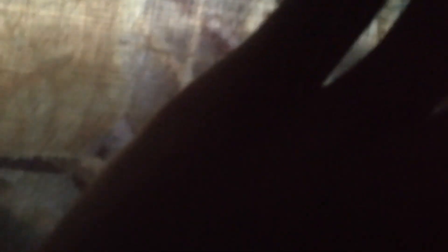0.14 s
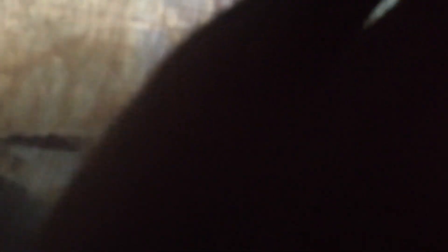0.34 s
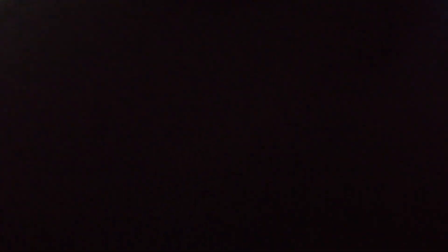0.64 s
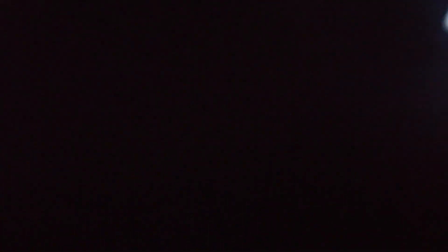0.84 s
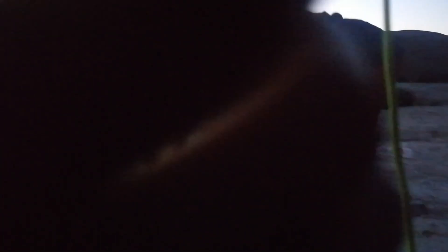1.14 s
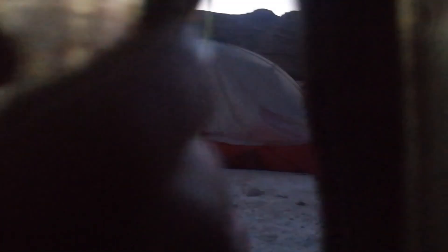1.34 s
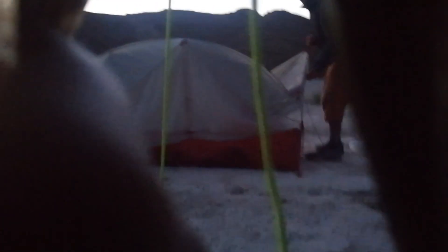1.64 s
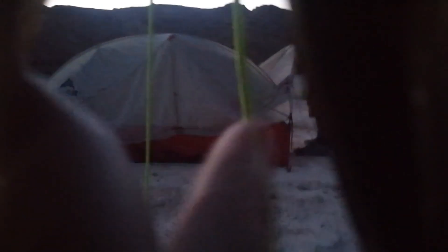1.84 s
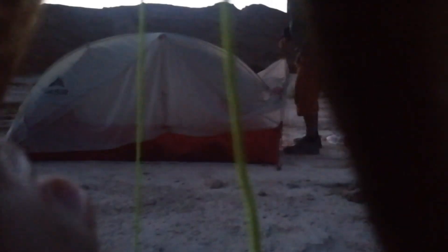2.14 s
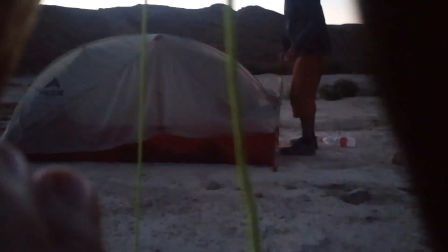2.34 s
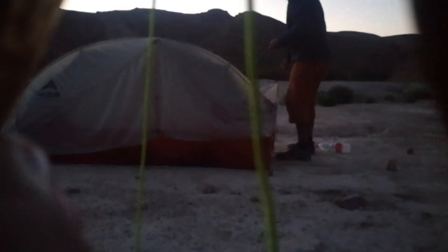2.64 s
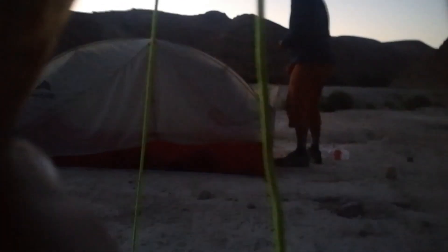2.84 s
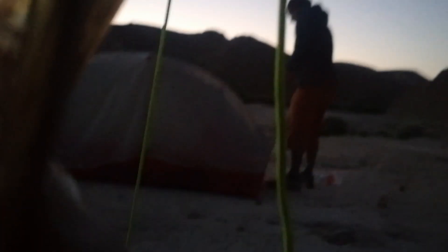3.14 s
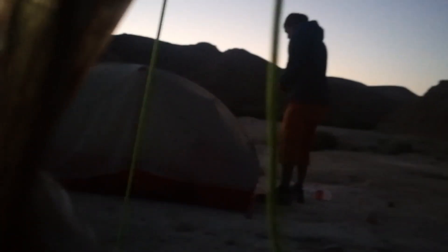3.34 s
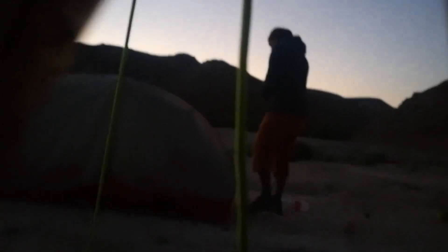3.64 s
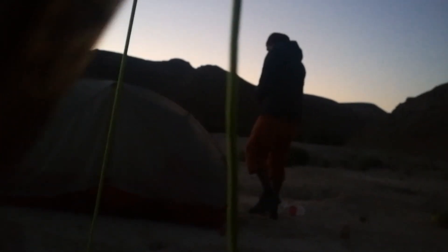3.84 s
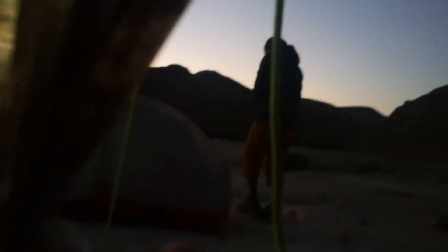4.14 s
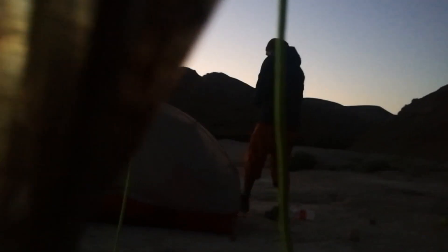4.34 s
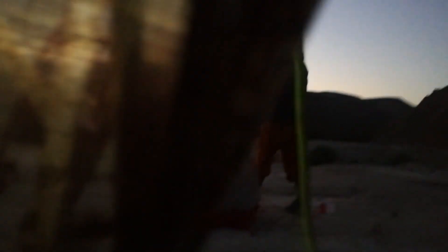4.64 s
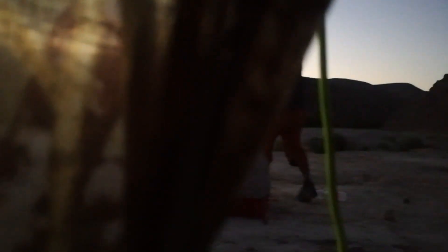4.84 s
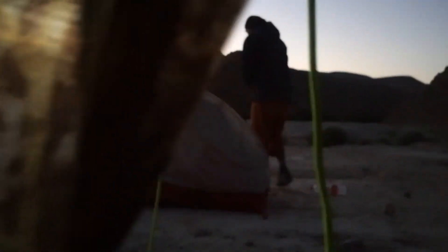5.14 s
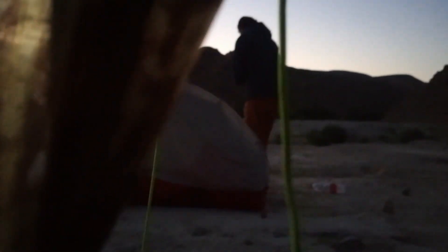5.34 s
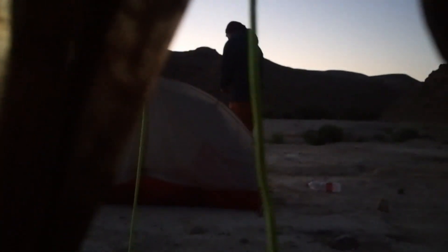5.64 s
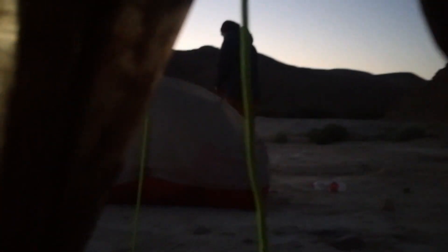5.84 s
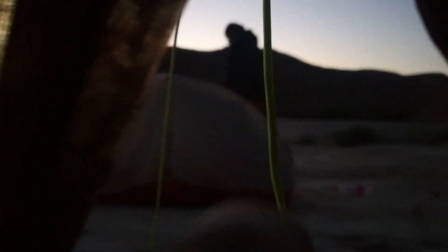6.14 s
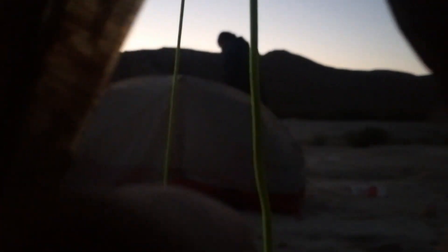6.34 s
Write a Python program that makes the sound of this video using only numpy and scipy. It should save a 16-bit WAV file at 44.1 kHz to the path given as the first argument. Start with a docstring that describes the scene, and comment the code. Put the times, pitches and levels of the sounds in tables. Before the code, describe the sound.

Thin tent fabric rustles, swishes and snaps close by in irregular gusts, thinning to near quiet, with a small distant bird whistling twice.

```python
"""Gusts tug at a tent door held open beside a two-port microphone, over still air and faint hiss.
From the start, shaped noise makes the cloth swish and the walls billow, and low noise is wind at the ports.
Damped low waves are panels thumping softly; short pitched bursts of noise are creases snapping.
After 3.6 s a small distant bird whistles wobbling tones, and something hollow scuffs along the floor sheet.
Thin steady tones come in at 5.56 s, and the bird whistles again at 5.86 s."""
import sys
import numpy as np
from scipy import signal
from scipy.fft import rfft, irfft
from scipy.io import wavfile
from scipy.ndimage import uniform_filter1d

SR = 44100
rng = np.random.default_rng(int(sys.argv[2]) if len(sys.argv) > 2 else 0)


def to_wav(sig):
    """Store sig (one row per channel, or 1-D mono) as 16-bit WAV at the path in sys.argv[1].

    Samples outside -1..1 are clipped; the rate is SR.
    """
    pcm = np.clip(np.atleast_2d(sig), -1, 1) * 32767
    pcm = np.round(pcm).astype(np.int16)
    wavfile.write(sys.argv[1], SR, pcm.T)  # frames by channels


N = 285768  # length of the scene in samples

PORT_LAG_S = 0.000657  # sound's travel time between the two ports
SNAP_LEAD_S = 0.005  # room for a snap to swell before its listed time

# Where the moving cloth is: time_s, side (about -1 at the right to 1 at the left, no unit)
CLOTH_SIDE = [(0.0, -1.16), (0.3, -1.1), (1.1, 0.99), (5.1, 1), (5.3, 0.64), (5.55, 0.48), (5.67, -0.028),
              (6.48, 0.034)]


def gain_of(db):
    """Turns decibels into a factor on the sound pressure."""
    return 10 ** (np.asarray(db) / 20)


def evened(x):
    """Scales a signal to an average strength (rms) of one."""
    return x / np.sqrt(np.mean(x ** 2) + 1e-20)


def read(points, hz):
    """Reads a spectrum in between its points, with pitch spaced as the ear hears it (log frequency)."""
    point_hz, value = np.transpose(points)
    return np.interp(np.log(hz + 1), np.log(point_hz + 1), value)


def follow(rows, t):
    """Reads every column of a table of changes at the times t."""
    s, *columns = np.transpose(rows)
    return [np.interp(t, s, column) for column in columns]


def add(mix, s, sound):
    """Mixes a sound in at time s, cutting it at the end of the mix."""
    part = mix[round(s * SR):][:len(sound)]
    part += sound[:len(part)]


def ports(pan_db):
    """Left and right gains for a level difference, keeping the summed power of both ports the same."""
    left_power = 1 / (1 + gain_of(-2 * np.asarray(pan_db)))
    return np.sqrt(2 * np.array([left_power, 1 - left_power]))


def strokes(t):
    """Swish dB, hiss dB, left-right dB and tilt: each drag of cloth rises, holds and falls over slack stirring."""
    # Cloth dragging over cloth: peak_s (start of the hold), rise_s, hold_s, fall_s, swish_db, fine_hiss_db,
    # left_minus_right_db, hiss_tilt_db_per_octave
    drags = [(0.033, 0.3, 0.083, 0.081, -42, -34.5, 0, -1.5),
             (0.17, 0.069, 0.011, 0.13, -45.5, -44.5, 3, -2),
             (0.432, 0.15, 0.058, 0.11, -46.5, -46, 7, -2.5), (0.563, 0.21, 0.19, 0.18, -52, -48, 7.5, 0.5),
             (0.78, 0.21, 0.12, .1, -48, -44.5, 8, 0), (0.89, 0.017, 0.017, .02, -51, -33, 12, 8.5),
             (0.957, 0.13, .1, 0.16, -52, -46, 5.5, 6), (1.107, 0.11, 0.073, 0.027, -53, -43, 9, 5),
             (1.213, .03, 0.057, 0.042, -58, -60, 11, -1), (1.314, 0.073, 0.12, 0.15, -48, -51, 7, -2),
             (1.55, 0.2, 0.072, .15, -45, -44.5, 12.5, -3), (1.744, 0.2, .01, 0.11, -43, -33.5, 9, 2.5),
             (1.868, 0.17, 0.041, 0.16, -57.5, -51.5, 15, 2), (1.954, 0.11, 0.074, 0.17, -55.5, -52, 15, 0),
             (2.121, 0.18, 0.024, 0.15, -50.5, -45.5, 18, -4), (2.743, 0.03, 0.12, 0.054, -61, -59, 10, 2),
             (2.884, .04, .01, 0.028, -58, -67, 5, -9), (2.98, 0.065, 0.024, .1, -71, -65, 11, 2),
             (3.198, 0.17, 0.0083, 0.054, -89, -62, 9, 4), (3.357, 0.057, 0.24, 0.21, -62.5, -55, 10, 4.5),
             (3.601, 0.079, 0.01, 0.04, -46.5, -46.5, 12, -2.5),
             (3.692, 0.14, 0.063, 0.095, -58, -49, 11, 3.5), (3.842, .05, 0.017, 0.067, -64, -65, 8, 0),
             (4.155, .08, 0.11, 0.079, -60, -51.5, 9, -1), (4.23, 0.07, 0.023, 0.75, -54, -56, 5, -2),
             (4.522, 0.37, 0.021, 0.068, -56, -50.5, 9, 0), (4.6, 0.14, 0.0044, 0.044, -43.5, -32, 9, 3),
             (4.652, 0.12, 0.061, 0.073, -49.5, -47.5, 7, 0), (4.93, 0.16, .07, .1, -53, -50, 5, 0.5),
             (5.015, 0.084, 0.046, 0.11, -48, -46.5, 3, -0.5),
             (5.149, 0.2, 0.18, 0.052, -52, -46.5, 9, 0.1), (5.402, 0.45, 0.12, 0.15, -59.5, -57.5, 8, -2),
             (6.022, 0.32, .01, 0.051, -68, -62, 8, 3.5), (6.155, 0.053, 0.013, 0.064, -79, -64, 9, 7),
             (6.398, 0.62, .08, 0.12, -65, -65.5, 5, 3.5)]
    edge_db = 24  # how far a stroke is down one rise before and one fall after its hold
    # The cloth stirring between strokes
    slack_swish_db, slack_hiss_db, slack_pan_db, slack_tilt_db_per_octave = -70, -68.5, 2.5, 0.33
    peak, rise, hold, fall, swish_db, hiss_db, pan_db, tilt = np.transpose(drags)[:, :, None]
    before = np.maximum(peak - t, 0) / rise
    after = np.maximum(t - peak - hold, 0) / fall
    drop_db = edge_db * (before + after)
    # Doubling the decibels gives power, which adds up when strokes overlap
    swish_power = gain_of(2 * (swish_db - drop_db))
    hiss_power = gain_of(2 * (hiss_db - drop_db))
    slack_power = gain_of(2 * slack_hiss_db)
    all_hiss = hiss_power.sum(0) + slack_power
    all_swish = swish_power.sum(0) + gain_of(2 * slack_swish_db)
    # The louder strokes decide the side and the brightness
    pan = ((hiss_power * pan_db).sum(0) + slack_power * slack_pan_db) / all_hiss
    bright = ((hiss_power * tilt).sum(0) + slack_power * slack_tilt_db_per_octave) / all_hiss
    return 10 * np.log10(all_swish), 10 * np.log10(all_hiss), pan, bright


def smooth_strokes():
    """The stroke controls at every sample, worked out every 128 samples and joined by straight lines."""
    t = np.arange(0, N + 128, 128) / SR
    return [np.interp(np.arange(N) / SR, t, control) for control in strokes(t)]


def noise(colour, size, alike_hz, patchy_db, flicker_db, grains=(0, 0), located=1, tilted=0):
    """Two-port noise: coloured, patchy, flickering; alike in both ports below alike_hz but for travel time."""
    hop = size // 4
    frames = N // hop + 5
    hz = np.fft.rfftfreq(size, 1 / SR)[:, None]
    t = np.arange(frames) * hop / SR

    spectra = []
    for port in grains:
        grainy = rng.standard_normal(frames * hop) + np.resize(port, frames * hop)
        spectra.append(signal.stft(grainy, nperseg=size, noverlap=size - hop)[2][:, :frames])
    first, second = spectra

    patches = rng.standard_normal((frames, len(hz))).T
    patches = uniform_filter1d(patches, size=size // 40, axis=0)
    patches = evened(uniform_filter1d(patches, size=20, axis=1))
    flicker = evened(uniform_filter1d(rng.standard_normal(frames), size=5))

    # Low tones match at the two ports, high ones go their own way
    same = 1 / (1 + (hz / alike_hz) ** 2)
    lag_s = located * PORT_LAG_S * follow(CLOTH_SIDE, t)[0]
    right = (same * first + np.sqrt(1 - same ** 2) * second) * np.exp(-2j * np.pi * hz * lag_s)
    z = np.array([first, right])

    octaves_up = np.log2((hz + 1) / 7000)
    tilt = np.clip(strokes(t)[3], -5, 9)  # dB per octave
    shade = gain_of(read(colour, hz) + tilted * tilt * octaves_up)
    z[1] *= gain_of(-1.5 * tilted * octaves_up)  # the right port hears tilted noise duller
    z *= shade / np.linalg.norm(shade, axis=0)
    z *= gain_of(patchy_db * patches + flicker_db * flicker)
    return evened(signal.istft(z, nperseg=size, noverlap=size - hop)[1][:, :N])


def crackle(per_s, level_db, spread_db, width):
    """Sparse clicks of uneven size, a width in samples wide, made of separate noise at each port."""
    size = gain_of(level_db + spread_db * np.minimum(rng.exponential(1, N), 2.4))
    clicks = size * (rng.random(N) < per_s / SR)
    fade = np.exp(-abs(np.arange(-400, 400)) / width)
    return signal.oaconvolve(clicks, fade, "same") * rng.standard_normal((2, N))


def cloth(slaps):
    """A swish and a finer hiss share the same slipping threads; the swish also carries the slaps."""
    # Colour of the dull drag of cloth: pitch_hz, level_db (per Hz, relative)
    swish_colour = [(250, -10), (450, 0), (700, 2), (1000, 6.5), (1400, 6), (1900, 6), (2500, 2), (3200, 1),
                    (4200, -16), (7000, -68)]
    # Colour of the fine thread hiss before tilting: pitch_hz, level_db (per Hz, relative)
    hiss_colour = [(1500, -52), (2500, -33), (3300, 7.5), (4200, 5), (5300, 2), (6800, 5), (9500, 4),
                   (13000, 1), (15500, 1.5), (17000, -13)]
    swish_db, hiss_db, pan_db, _ = smooth_strokes()
    slips = crackle(per_s=380.0, level_db=-6.0, spread_db=7.0, width=7.7)
    swish = noise(swish_colour, size=256, alike_hz=1370, patchy_db=2.5, flicker_db=1.0, grains=slips + slaps)
    hiss = noise(hiss_colour, size=256, alike_hz=2680, patchy_db=2.0, flicker_db=0.75, grains=slips, tilted=1.0)
    swish_ports = ports(0.72 * pan_db)  # the duller swish leans less to one side
    return gain_of(swish_db) * swish_ports * swish + gain_of(hiss_db) * ports(pan_db) * hiss


def panels(slaps):
    """Lumpy low wash of the billowing walls, and wind muttering at the ports without a travel lag."""
    # Gusts: time_s, wind_mutter_db, wall_billow_db (before the share of the strokes)
    gusts = [(0.0, -64, -69), (0.32, -74, -62), (0.72, -62, -67.5), (1.04, -76, -72), (1.3, -61, -58.5),
             (1.43, -65, -61), (1.6, -62.5, -60), (2.06, -60, -58.5), (2.2, -64.5, -56), (2.38, -70, -81),
             (2.71, -72, -65), (2.92, -62, -68), (3.08, -65, -82), (3.3, -76, -58.5), (3.48, -68, -53),
             (3.59, -52.5, -55.5), (3.99, -76, -57), (4.26, -63, -64.5), (4.53, -56, -57),
             (4.76, -63.5, -59.5), (4.93, -61, -62), (5.2, -56.5, -66.5), (5.58, -59, -66),
             (6.48, -61, -64)]
    # Colour of the wind at the ports: pitch_hz, level_db (per Hz, relative)
    mutter_colour = [(15, -4.5), (40, 2), (85, 3.5), (130, -5.5), (220, -12.5), (400, -80)]
    # Colour of the billowing walls: pitch_hz, level_db (per Hz, relative)
    belly_colour = [(30, -40), (80, -8.5), (130, -3.5), (300, -4), (480, -13), (750, -13.5), (1100, -17.5),
                    (2000, -92)]
    lull_db, belly_per_swish = -58, 0.56  # walls gain 0.56 dB for each dB of swish above the lull
    mutter_db, billow_db = follow(gusts, np.arange(N) / SR)
    belly_db = billow_db + belly_per_swish * (smooth_strokes()[0] - lull_db)
    mutter = noise(mutter_colour, size=2048, alike_hz=613, patchy_db=1.5, flicker_db=0.8, located=0)
    belly = noise(belly_colour, size=512, alike_hz=860, patchy_db=2.0, flicker_db=1.0,
                  grains=slaps, located=1.26)
    return gain_of(mutter_db) * mutter + gain_of(belly_db) * ports(0.81)[:, None] * belly


def background():
    """Still desert air and microphone hiss as steady noise; thin steady tones show near the end."""
    # Colour of the air and hiss: pitch_hz, level_db (per Hz, relative)
    air_colour = [(150, -9), (250, 7), (500, 2.5), (1200, 1.5), (3000, -1.5), (5000, -3), (8000, -14),
                  (13000, -15), (15600, -12.5)]
    # Faint thin tones: pitch_hz, level_db
    thin_tones = [(7203, -86), (9604, -83)]
    air_db, tones_from_s, tones_fade_s = -67, 5.56, 0.057
    t = np.arange(N) / SR
    tones = sum(gain_of(db) * np.sin(2 * np.pi * hz * t) for hz, db in thin_tones) * np.sqrt(2)
    shade = gain_of(read(air_colour, np.fft.rfftfreq(N, 1 / SR)))
    air = irfft(rfft(rng.standard_normal((2, N))) * shade, N)
    fade_in = np.clip((t - tones_from_s) / tones_fade_s, 0, 1)
    return gain_of(air_db) * ports(2.2)[:, None] * evened(air) + tones * fade_in


def heard(events, sounds):
    """Places two-port sounds; the port nearer the cloth gets each one first."""
    out = np.zeros((2, N))
    for s, pair in zip(events, sounds):
        lag_s = PORT_LAG_S * follow(CLOTH_SIDE, s)[0]
        add(out[0], s - lag_s / 2, pair[0])
        add(out[1], s + lag_s / 2, pair[1])
    return out


def thump(peak_db, hz):
    """A damped low push of air, one or two cycles."""
    turns = np.arange(4000) / SR * hz
    push = np.sin(2 * np.pi * turns) * turns * np.exp(-turns / 0.38)
    return gain_of(peak_db) * ports(1.0)[:, None] * push / abs(push).max()


def thumps():
    """Panels pulled taut, each pushing the air once."""
    # Taut panels: start_s, peak_db (before sharing between the ports), pitch_hz
    pulls = [(0.082, -41.5, 199), (0.118, -43, 129), (0.562, -47, 158), (0.801, -46.5, 232),
             (0.975, -50, 101), (1.281, -41, 169), (1.384, -42, 112), (1.478, -42.5, 212),
             (1.542, -39.5, 307), (1.794, -37.5, 188), (2.008, -47, 99), (2.143, -42, 232),
             (2.345, -46.5, 208), (2.646, -51.5, 260), (2.75, -50.5, 249), (2.808, -46.5, 71.4),
             (2.975, -39.5, 163), (3.044, -44, 146), (3.24, -53, 250), (3.314, -54, 220),
             (3.336, -43.5, 294), (3.417, -49, 184), (3.578, -61, 79), (3.618, -40, 145),
             (3.685, -41.5, 220), (3.712, -42.5, 202), (3.781, -45.5, 78), (3.918, -45, 326),
             (3.988, -44.5, 95), (4.034, -47, 202), (4.368, -48, 181), (4.521, -40.5, 230),
             (4.584, -52, 137), (4.695, -39.5, 320), (4.986, -49, 125), (5.318, -46, 240),
             (5.354, -46, 168), (5.98, -50, 74)]
    return heard([row[0] for row in pulls], [thump(*row[1:]) for row in pulls])


def snap(level_db, centre_hz, pan_db, octaves, seed):
    """A burst of a few cycles around one pitch, with a weak wash of noise around it, before and after."""
    count = seed.shape[1]
    t = np.arange(count) / SR - SNAP_LEAD_S
    hz = np.fft.rfftfreq(count, 1 / SR) + 1
    length_s = 0.0001 + 1.0 / centre_hz  # low creases are large and let go more slowly
    burst_shape = np.exp(np.where(t < 0, 1.1, -1) * t / length_s)
    wash_shape = gain_of(-23.5 - 60 * abs(t - 0.002) / 0.027)
    # Bell-shaped bands on an octave scale
    crease = np.exp(-0.5 * (np.log2(hz / centre_hz) / (1.8 * max(octaves, 0.2))) ** 2)
    fold_body = gain_of(-11.5) * np.exp(-0.5 * (np.log2(hz / 1800) / 0.46) ** 2)
    # The far port is shaded from treble
    shading = ports(pan_db * (hz / centre_hz) ** 0.84) / ports(pan_db)[:, None]
    band = (crease + fold_body) * shading
    raw = 0.46 * seed[0] + 1.07 * seed[1:]  # a part both ports share, and a part of their own
    burst = irfft(rfft(raw * (burst_shape + wash_shape)) * band, count)
    size = np.sqrt((burst ** 2).sum(axis=1, keepdims=True) / (length_s * SR))
    return gain_of(level_db) * ports(pan_db)[:, None] * burst / size


def snaps():
    """Creases popping, each from its own bit of noise."""
    # Popping creases: time_s, level_db (before sharing between the ports), centre_hz,
    # left_minus_right_db (at the centre pitch), spread_octaves (at least 0.2, then widened 1.8 times)
    pops = [(0.178, -25.5, 5440, 18, 1.7), (0.209, -28.5, 5400, 1, 0.23), (0.337, -26.5, 4270, -5, 0.17),
            (0.36, -38, 2500, 4.5, 1), (0.386, -34, 4500, -4, 0.45), (0.407, -35, 4500, 3, 0.45),
            (0.414, -32.5, 1290, 20, 0.19), (0.432, -30, 5960, 4, 0.38), (0.4396, -35, 1300, 4, 0.31),
            (0.448, -21.5, 4240, -2, 0.16), (0.472, -33, 1010, 2, 0.32), (0.4936, -25.5, 3080, 5, 0.74),
            (0.5146, -23.5, 5160, 7, 0.3), (0.521, -25, 6600, 11, 0.52), (0.5278, -24, 6960, 19, 0.6),
            (0.5584, -19.5, 3680, 3, 0.46), (0.563, -29.5, 4870, 15, 0.18), (0.591, -32, 2200, 4, 0.53),
            (0.6737, -24.5, 12000, 12, 0.28), (0.7009, -20, 6300, 8, 0.71), (0.7131, -23.5, 3640, 5, 1.8),
            (0.721, -24, 5960, 10, 0.7), (0.7637, -22.5, 4240, 11, 0.59), (0.801, -25.5, 8600, 15, 0.16),
            (0.8132, -21, 5720, 3, 1.0), (0.8439, -21.5, 8700, 27, 0.12), (0.8767, -19.5, 6410, 6, 1.3),
            (0.851, -23, 9050, 18, 0.16), (1.0102, -21, 9400, 11, 0.16), (1.037, -23, 3800, 5, 0.95),
            (1.0919, -16, 5840, 10, 1.2), (1.115, -26.5, 4740, 27, 1.5), (1.1794, -20.5, 8000, 10, 0.78),
            (1.268, -34.5, 4790, 3, 1.6), (1.294, -28.5, 1200, -2, 0.3), (1.311, -23.5, 3500, -5, 0.15),
            (1.3223, -29.5, 3970, 6, 0.56), (1.4967, -27, 3130, 8, 0.61), (1.515, -26.5, 5050, 10, 0.56),
            (1.552, -22, 3200, 14, 1.06), (1.559, -17, 9770, 13, 0.85), (1.5744, -21, 8490, 8, 1.1),
            (1.582, -18, 5200, 20, 0.37), (1.783, -20.5, 10490, 24, 0.83), (1.7979, -20.5, 2640, 13, 0.7),
            (1.9161, -31.5, 8710, 21, 0.31), (2.053, -31.5, 1660, 8, 0.68), (2.1045, -27, 4420, 23, 0.24),
            (2.147, -53, 2690, 27, 1.6), (2.7527, -27.5, 4300, 23, 0.41), (2.816, -28, 3070, 20, 0.29),
            (2.8201, -16, 10100, 27, 0.54), (2.9465, -40, 10550, 17, 0.77), (2.9603, -36, 6430, 6, 1.9),
            (3.047, -55, 775, 10, 0.4), (3.1866, -41, 11200, 21, 0.31), (3.2366, -50, 810, 22, 0.21),
            (3.3404, -39, 1950, 9, 0.56), (3.3676, -16, 6400, 22, 0.65), (3.4745, -41.5, 1000, 10, 0.28),
            (3.522, -30, 7060, 3, 0.31), (3.526, -39, 744, 14, 0.31), (3.5464, -37, 3610, 6, 0.75),
            (3.592, -32, 6370, 9, 1.8), (3.608, -36, 2420, -2, 1.1), (3.6886, -47, 1500, 2, 0.94),
            (3.743, -22.5, 11100, 6, 0.4), (3.7893, -32, 2560, 6, 0.99), (3.945, -38.5, 1080, 5, 0.17),
            (3.979, -50, 1150, 3, 0.18), (3.9908, -34.5, 1150, 3, 0.17), (4.0394, -41.5, 5490, 4, 1.2),
            (4.056, -38.5, 6130, 5, 0.6), (4.135, -32, 6600, 9, 0.51), (4.2027, -24, 7440, 20, 0.17),
            (4.258, -29.5, 2530, 7, 1), (4.3225, -27.5, 8000, 6, 0.18), (4.3703, -39.5, 1870, 15, 0.52),
            (4.5929, -21, 2780, 17, 2.1), (4.609, -25, 7600, 28.5, 0.2), (4.621, -19.5, 6360, 14, 0.84),
            (4.6691, -24, 4400, 6, 2), (4.7057, -18, 6270, 10, 0.55), (4.767, -42, 3560, 33, 0.34),
            (4.838, -17.5, 6760, 9.5, 0.44), (4.8962, -39, 3190, -2, 1.3), (4.917, -34, 2090, 10, 0.97),
            (4.9949, -18.5, 4050, 12, 1.5), (4.999, -22.5, 6440, 22, 0.15), (5.0247, -29, 4670, 11, 1.3),
            (5.0538, -33, 4160, -3, 0.21), (5.063, -22, 2830, 5, 0.52), (5.195, -29, 8140, -2, 0.3),
            (5.2256, -26.5, 4970, 31, 0.48), (5.333, -35, 8300, -8, 0.88), (5.499, -35.5, 3360, -3, 0.18),
            (5.5584, -30.5, 9600, 6, 0.3), (5.6611, -41, 6230, 0, 0.27), (5.6745, -39.5, 9370, 5, 0.94),
            (5.9081, -32, 14600, 11, 0.24), (6.008, -34.5, 4800, 21, 0.37), (6.3306, -42, 5470, 5, 0.21),
            (6.3721, -31.5, 14600, 13, 0.25), (6.4384, -32.5, 5330, 29, 0.12)]
    seeds = rng.standard_normal((len(pops), 3, 2048))
    starts = [row[0] - SNAP_LEAD_S for row in pops]
    return heard(starts, [snap(*row[1:], seed) for row, seed in zip(pops, seeds)])


def whistle(rows):
    """A near sine; the trill wobbles pitch and level together, and the level also wavers at random."""
    trill_hz, trill_pitch, trill_db = 42.5, 0.05, 3.5  # rate; pitch share and level swing at full trill
    t = np.arange(rows[0][0], rows[-1][0], 1 / SR)
    hz, db, trill = follow(rows, t)
    beat = trill * np.cos(2 * np.pi * trill_hz * (t - t[0] - 0.009))
    tone = np.sin(2 * np.pi * np.cumsum(hz * (1 + trill_pitch * beat)) / SR)
    waver_db = 1.3 * evened(uniform_filter1d(rng.standard_normal(len(t)), size=200))
    level = np.sqrt(2) * gain_of(db + trill_db * beat + waver_db)
    return level * tone * signal.windows.tukey(len(t), 0.08)


def bird():
    """Whistles with a brief scatter off the ground, different at each port."""
    # One table for each whistled note: time_s, pitch_hz, level_db, trill_depth (0-1, no unit)
    notes = [
        [(3.605, 3190, -55, 0), (3.625, 3230, -62, 0), (3.64, 3210, -52.5, 0.1), (3.656, 3140, -65, 0),
         (3.67, 3000, -69, 0)],
        [(3.676, 2920, -55, 0.1), (3.686, 2880, -67, 0.6), (3.7, 2990, -63, 0), (3.73, 2950, -68, 0.1)],
        [(3.798, 3060, -64, .9), (3.84, 2920, -67, 0.7), (3.876, 2930, -73, 1.)],
        [(5.864, 3130, -66, 0), (5.879, 3330, -62, 0), (5.892, 3410, -52, 0.1), (5.906, 3140, -58, 0),
         (5.921, 3316, -51.5, 0.1), (5.965, 3200, -51, 0.1), (6.004, 3150, -50.5, 0), (6.014, 2920, -66, 0.1),
         (6.026, 2970, -67, 0)],
        [(6.036, 2880, -68, 0), (6.047, 2950, -60, 0.1), (6.059, 3040, -57, 0.05), (6.07, 2940, -63, 0),
         (6.077, 2900, -72, 0.05)],
        [(6.131, 3080, -66, 0.4), (6.163, 3090, -58.5, .9), (6.19, 2990, -61, 0.8), (6.212, 2980, -61, 1.),
         (6.235, 2880, -70, 0.9), (6.264, 2840, -71, .8)],
    ]
    song = np.zeros(N)
    for rows in notes:
        add(song, rows[0][0], whistle(rows))
    scatter = rng.standard_normal((2, 3000)) * gain_of(-60 * np.arange(3000) / SR / 0.13)
    scatter = scatter / np.linalg.norm(scatter[0])
    echo = signal.oaconvolve(song[None], scatter, axes=1)[:, :N]
    return ports(1.5)[:, None] * song + gain_of(-8) * echo


def scuff():
    """Something hollow scuffs along the floor sheet: stuttering friction through a hollow body."""
    # Loudness of the scuff: time_s, level_db (before the stutter)
    rubs = [(3.949, -92), (3.975, -66), (3.995, -53), (4.02, -66.5), (4.045, -62), (4.072, -60.5),
            (4.1, -72)]
    # Colour of the hollow body: pitch_hz, level_db (per Hz, relative)
    hollow_colour = [(500, -30), (850, -8), (1100, 0), (1400, -6), (1800, -5), (2400, -16), (4000, -45)]
    t = np.arange(rubs[0][0], rubs[-1][0], 1 / SR)
    shade = gain_of(read(hollow_colour, np.fft.rfftfreq(len(t), 1 / SR)))
    rub = irfft(rfft(rng.standard_normal(len(t))) * shade, len(t))
    stutter_db = 3.3 * evened(uniform_filter1d(rng.standard_normal(len(t)), size=200))
    out = np.zeros(N)
    add(out, t[0], gain_of(follow(rubs, t)[0] + stutter_db) * evened(rub))
    return out


def scene():
    """All sources added up at the two ports."""
    # Loose folds slapping each other, heard in both the swish and the walls
    slaps = crackle(per_s=30.0, level_db=4.5, spread_db=3.5, width=84.0)
    return cloth(slaps) + panels(slaps) + background() + thumps() + snaps() + bird() + scuff()


def record(dry):
    """The top of the band is held down from 15850 Hz, then cut off at 16750 Hz."""
    shelf_hz, edge_hz = 15850, 16750
    corners_hz = [0, shelf_hz, shelf_hz + 150, edge_hz - 150, edge_hz, SR / 2]
    gains = [1, 1, gain_of(-19), gain_of(-24), 0, 0]
    taps = signal.firwin2(1023, corners_hz, gains, window=("kaiser", 9), fs=SR)
    return signal.oaconvolve(dry, taps[None], "same", axes=1)


dry = scene()
out = record(dry)
to_wav(out)
```